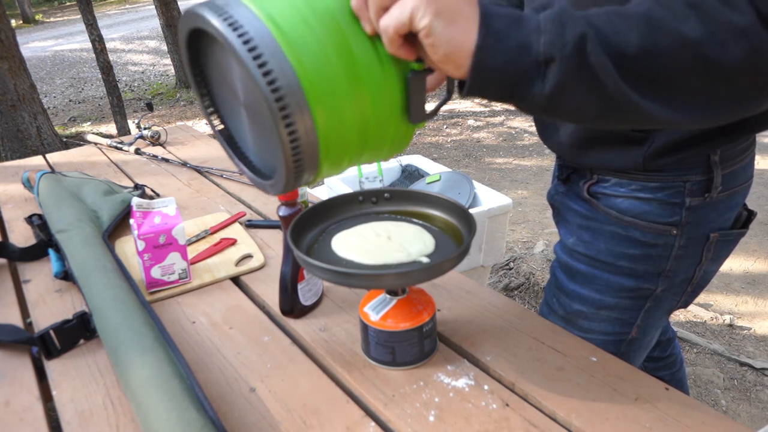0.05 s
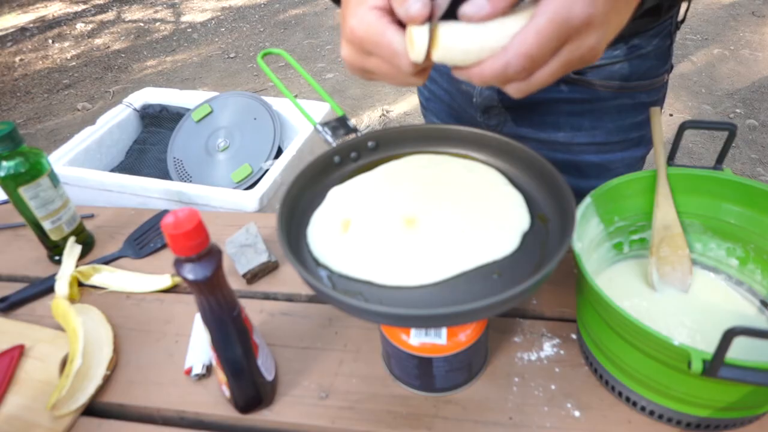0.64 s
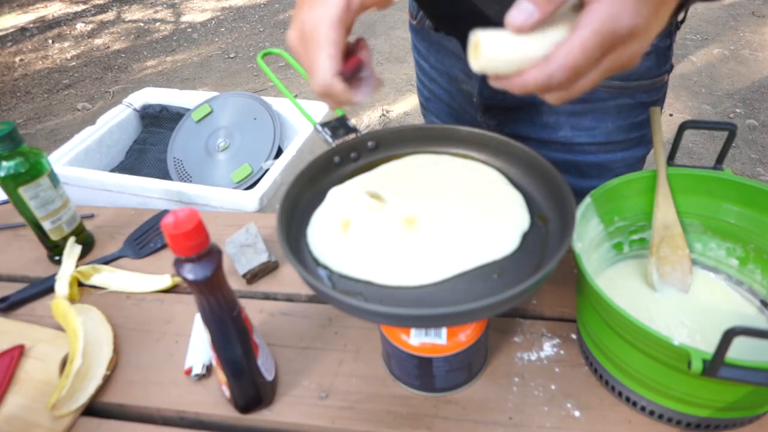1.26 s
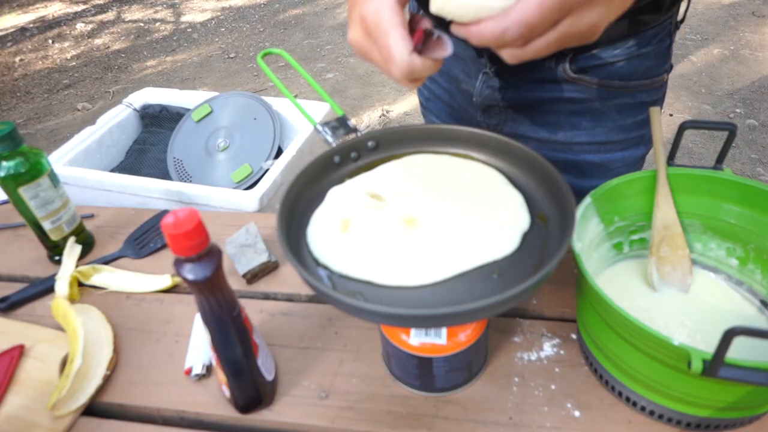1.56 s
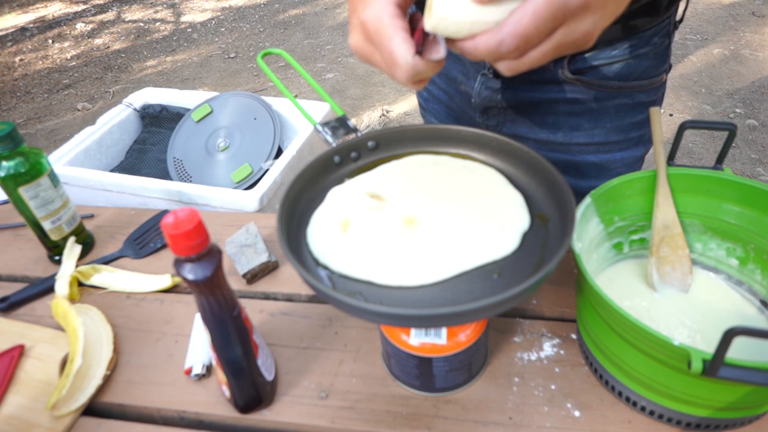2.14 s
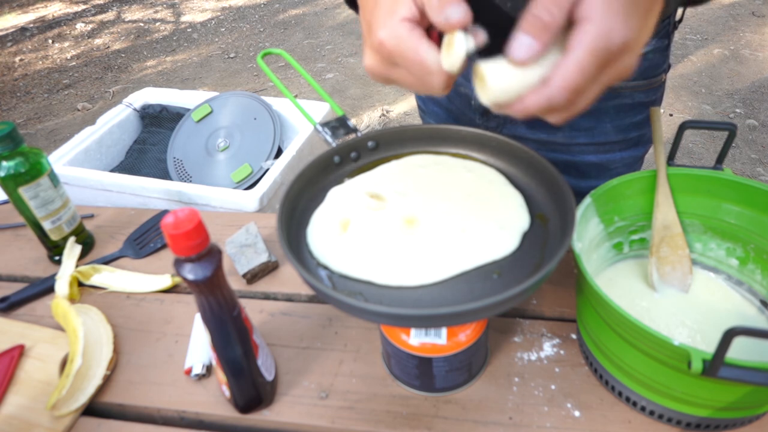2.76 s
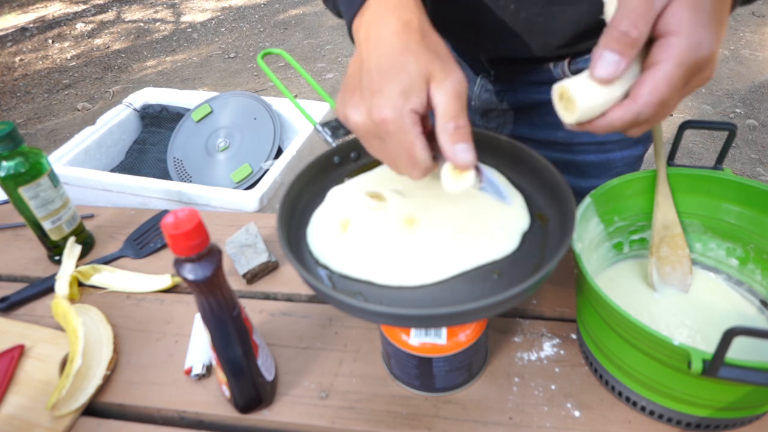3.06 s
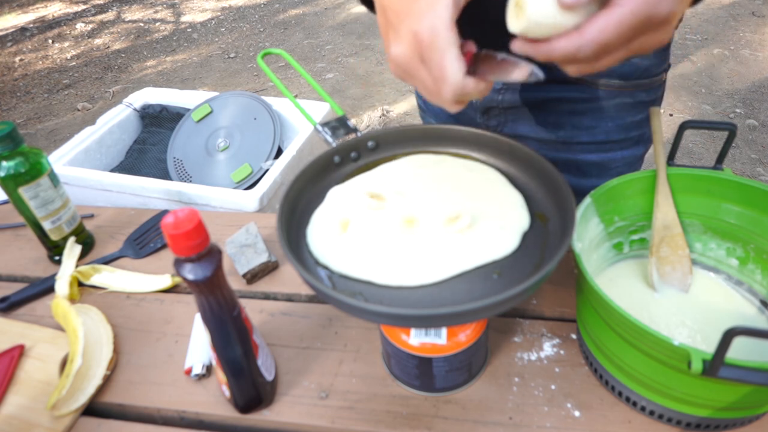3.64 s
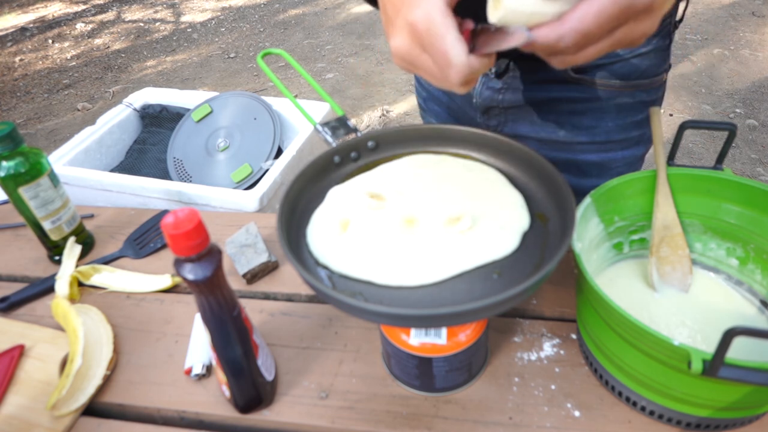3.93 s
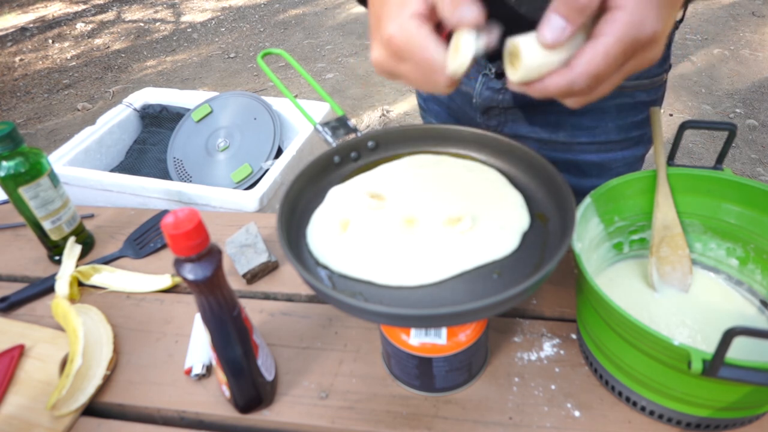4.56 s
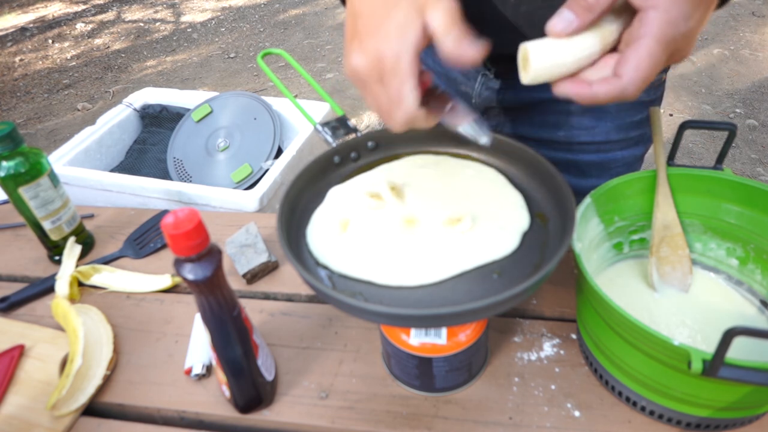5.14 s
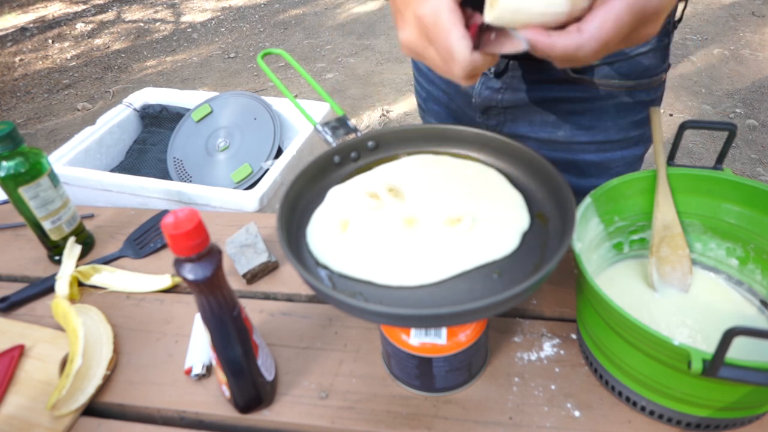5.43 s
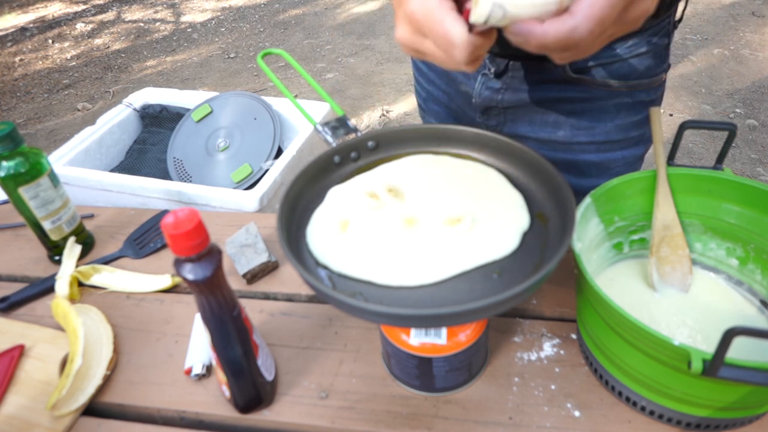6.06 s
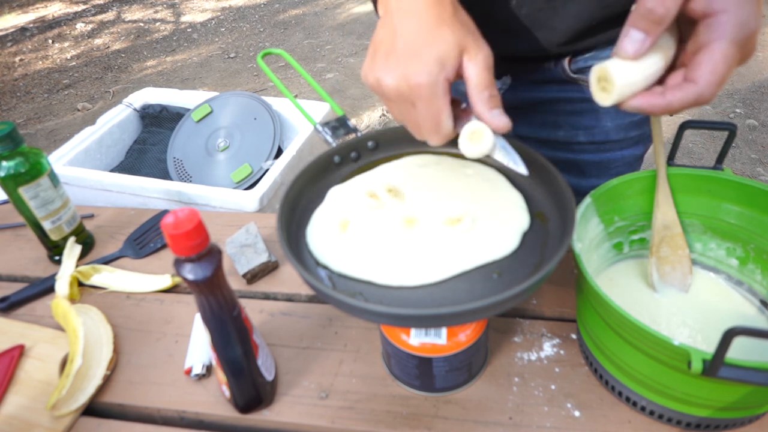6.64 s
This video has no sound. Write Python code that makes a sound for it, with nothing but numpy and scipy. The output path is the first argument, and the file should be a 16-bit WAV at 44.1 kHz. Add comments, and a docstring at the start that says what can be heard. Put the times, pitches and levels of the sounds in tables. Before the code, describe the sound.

Pancake batter crackles finely in a pan over a steadily hissing gas burner outdoors, as wind rumbles and a knife lightly knocks.

```python
"""A gas camp stove on a picnic table, under a pan of pancake batter. At first the microphone is a step
away: the turbulent flame roars softly, the jet hisses in the burner's resonances and steam bubbles burst
faintly in the batter. A third of a second in, the sound cuts with a click to close by: the sizzle
is louder, a few large bubbles pop, the jet whistles faintly and a breeze buffets the flame into a rumble.
From about one second on, a knife now and then drops banana slices lightly into the pan."""
import sys
import numpy as np
from scipy.fft import rfft, irfft, next_fast_len
from scipy.io import wavfile
from scipy.ndimage import map_coordinates

SR = 44100
rng = np.random.default_rng(int(sys.argv[2]) if len(sys.argv) > 2 else 0)


def wrap_up_sound(samples):
    """Save the sound to the file named by the first command line argument, as 16-bit audio."""
    columns = np.atleast_2d(samples).T
    # keep every value between -1 and 1, then stretch to whole-number steps
    tamed = np.clip(columns, -1, 1)
    steps = np.round(tamed * 32767).astype(np.int16)
    wavfile.write(sys.argv[1], SR, steps)


N = 299439

# Gusts across the table. Each row: time in seconds, rumble level in dB before its trim.
GUSTS = [(0.36, -49.0), (0.48, -40.5), (0.65, -49.5), (0.93, -35), (1.1, -41.5), (1.6, -40.0), (1.85, -45),
         (2.15, -40.5), (2.75, -42.5), (2.95, -36.5), (3.85, -41.5), (4.15, -38.0), (4.65, -47.5),
         (5.15, -40.0), (6.35, -45.5), (6.62, -37.5), (6.79, -46)]
# The flame in the wind. Each row: frequency in Hz, relative level in dB.
RUMBLE_SPECTRUM = [(8, -15), (22, -5.5), (43, 0), (60, -4.5), (78, -6), (100, -11), (140, -20), (300, -39),
                   (1000, -88)]
# A brief click where the sound cuts abruptly from far to close, then light knocks of knife and food.
# Each row: start in seconds, thud level in dB, click level in dB before dulling, seconds to fall 60 dB.
CLICK_AND_KNOCKS = [(.3445, -32, -38, .005), (.9628, -38, -32.5, .004), (.9650, -38, -62, .045),
                    (.9730, -54, -47, .03), (.9910, -47, -45, .04), (1.0090, -45, -44, .035),
                    (1.6753, -36.5, -70, .013), (4.9760, -44, -58, .05)]
# The two parts of each of these. Each row: frequency in Hz, relative level in dB.
THUD_SPECTRUM = [(200, -21), (500, 3), (820, 6), (1150, -9), (1500, -2), (1850, -17), (2200, -11),
                 (3000, -25), (6000, -16), (16000, -60)]
CLICK_SPECTRUM = [(500, -25), (2000, -1), (4200, 6), (7000, -8), (10000, -11), (13000, 1), (16000, -14)]
# The batter's loudest pops. Each row: start in seconds, level in dB.
LARGE_BUBBLES = [(0.4221, -34), (0.776, -33), (1.2152, -36), (1.2711, -33.5), (2.2806, -34.5),
                 (2.6981, -29), (3.4016, -34), (3.5949, -36), (4.2059, -38), (4.5238, -34), (5.4172, -33),
                 (6.1625, -34.5)]
# Flame roar and broad jet hiss, a step away and close. Each row: frequency in Hz, base level in dB per Hz.
FLAME_SPECTRUM_FAR = [(15, -85), (45, -75), (90, -70.5), (170, -66), (250, -68), (360, -66.5), (480, -76),
                      (660, -79), (760, -83), (950, -83), (1300, -92.5), (2500, -115)]
FLAME_SPECTRUM_NEAR = [(15, -95), (70, -70), (130, -68), (165, -62.5), (260, -64), (370, -65.5), (440, -70),
                       (510, -77.5), (590, -77), (660, -81), (720, -91.5), (1100, -106), (2500, -120)]
JET_SPECTRUM_FAR = [(500, -115), (1500, -93.5), (3700, -93), (4400, -103), (7000, -104.5), (11000, -105),
                    (15500, -106.5)]
JET_SPECTRUM_NEAR = [(500, -115), (1200, -102), (1900, -101), (2500, -91), (3500, -95.5), (4300, -102),
                     (7000, -101.3), (8000, -103.5), (10000, -107), (12500, -107.5), (15500, -112)]
# Resonances of the burner and the gap under the pan at both distances, and two breathy whistles.
# Each row: centre in Hz, width in Hz, base level in dB per Hz.
BURNER_MODES_FAR = [(2770, 250, -94), (3240, 230, -83), (5040, 240, -92.5), (5380, 230, -92.5),
                    (8300, 400, -105), (10700, 360, -104), (12400, 450, -102)]
BURNER_MODES_NEAR = [(862, 183, -84.5), (1353, 133, -89.5), (1583, 220, -91.5), (2198, 270, -89),
                     (2890, 440, -89.5), (3743, 354, -92), (4890, 140, -97), (7450, 250, -104),
                     (8550, 440, -91.5), (9580, 470, -101), (10630, 320, -99), (12550, 450, -109.5)]
WHISTLE_MODES = [(3270, 244, -83.5), (5310, 204, -95)]
# The whistles swell and fade. Each row: time in seconds, low whistle in dB, high whistle in dB.
# Only the swing about each mean counts, widened by SWELL_DEPTH.
WHISTLE_SWELLS = [(0.36, -59.5, -72.0), (1.0, -60.5, -69), (1.55, -59.5, -72), (2.0, -63, -70),
                  (2.3, -59.5, -72.0), (2.75, -59.5, -70), (3.05, -59, -68.5), (3.6, -59.5, -68.5),
                  (4.05, -61.5, -76), (4.4, -60, -72), (4.85, -60.5, -73.0), (5.35, -60.0, -66.5),
                  (5.65, -60.0, -72.0), (5.95, -58, -72.0), (6.25, -61.0, -68.5), (6.79, -59, -73)]

CUT_S, TOP_HZ = .3445, 15730  # the cut from far to close; the microphone's upper band limit
RUMBLE_TRIM_DB, EDDY_DB, EDDIES_PER_S = 0.5, 1.24, 9
CLICK_CYCLES = 150  # a click's treble rolls off at this many cycles per decay time
FAR_SIZZLE_DB, SETTING_DB_PER_S = -12, 0.44  # fainter a step away; the batter fries less as it sets
CLUMP_DB, CLUMPS_PER_S = 2.4, 14  # bubbles burst in clumps
FLUTTER_PER_S, ROAR_FLUTTER_DB, HISS_FLUTTER_DB = 14, 0.73, 0.25
ROAR_TRIM_DB, SWELL_DEPTH = -0.3, 1.2


def amp(db):
    """Decibels to gain."""
    return 10 ** (np.asarray(db) / 20)


def unit(x):
    """x at rms 1."""
    return x / np.sqrt(np.mean(x ** 2) + 1e-20)


def shape(points, hz):
    """Gain of (Hz, dB) points joined on a log axis."""
    point_hz, db = np.transpose(points)
    return amp(np.interp(np.log(hz + 1), np.log(point_hz + 1), db))


def curves(rows):
    """One value per sample for each column after the time."""
    times, *columns = np.transpose(rows)
    return [np.interp(np.arange(N) / SR, times, column) for column in columns]


def wobble(rate):
    """A smooth random curve, rate knots a second."""
    knots = rng.standard_normal(int(N * rate / SR) + 4)
    return map_coordinates(knots, [np.arange(N) * rate / SR])


def filtered(x, response):
    """x through a gain that is a function of frequency."""
    size = next_fast_len(N + SR // 2)
    return irfft(rfft(x, size) * response(np.fft.rfftfreq(size, 1 / SR)), size)[:N]


def resonance(hz, centre, width, db):
    """Gain of one rounded resonance."""
    return amp(db) / (1 + 2 * ((hz - centre) / width) ** 2)


def noise(gain):
    """Gaussian noise whose level per Hz is the given function of frequency."""
    return filtered(rng.standard_normal(N) * np.sqrt(SR / 2), gain)


def rush(spectrum, modes=()):
    """Turbulent noise on a broad spectrum; each resonance adds its own power."""
    def gain(hz):
        mode_power = sum(resonance(hz, *mode) ** 2 for mode in modes)
        return np.sqrt(shape(spectrum, hz) ** 2 + mode_power)
    return noise(gain)


def breeze():
    """Air moving over the table buffets the flame into a low rumble: slow gusts, quick eddies inside."""
    gust_db, = curves(GUSTS)
    eddy_db = EDDY_DB * wobble(EDDIES_PER_S)
    return amp(gust_db + RUMBLE_TRIM_DB + eddy_db) * unit(rush(RUMBLE_SPECTRUM))


def click_and_knocks():
    """The click at the cut, then knife and food: each a thud with a click on top, duller if longer."""
    thud, click = unit(rush(THUD_SPECTRUM)), unit(rush(CLICK_SPECTRUM))
    out = np.zeros(N)
    t = np.arange(SR // 8) / SR
    for start_s, thud_db, click_db, t60 in CLICK_AND_KNOCKS:
        span = round(start_s * SR) + np.arange(len(t))
        dulled = filtered(click, lambda hz: 1 / np.hypot(1, (hz * t60 / CLICK_CYCLES) ** 2))
        decay = np.exp(-np.log(1000) * t / t60)
        out[span] += (amp(thud_db) * thud[span] + amp(click_db) * dulled[span]) * decay
    return out


def bubbles(start_s, db, hz, decay_cycles):
    """Each bursting bubble is a damped sine that dies within a few cycles."""
    t = np.arange(SR // 400) / SR
    cycles = np.minimum(hz, TOP_HZ)[:, None] * t
    waves = amp(db)[:, None] * np.sin(2 * np.pi * cycles) * np.exp(-cycles / decay_cycles)
    samples = (start_s[:, None] * SR).astype(int) + np.arange(len(t))
    return np.bincount(samples.ravel(), waves.ravel(), N)[:N]


def sizzle(near, per_second, largest_db, range_db, pitch_hz):
    """Steam bursts at random at the batter's rim: a clumped crackle that slowly eases."""
    when, size_rank, pitch_rank = rng.random((int(per_second * N / SR), 3)).T
    distance_db = FAR_SIZZLE_DB * (1 - near)
    setting_db = SETTING_DB_PER_S * np.arange(N) / SR
    vigour_db = distance_db - setting_db + CLUMP_DB * wobble(CLUMPS_PER_S)
    size_db = largest_db - range_db * np.sqrt(size_rank)  # small bubbles outnumber large ones
    db = size_db + vigour_db[(when * N).astype(int)]
    hz = pitch_hz * 2 ** (.4 - 1.3 * pitch_rank ** 2)  # most are high, a few lower
    return bubbles(when * N / SR, db, hz, decay_cycles=1.86)


def pops():
    """Close to the pan, a few large bubbles stand out of the crackle."""
    start_s, db = np.transpose(LARGE_BUBBLES)
    return bubbles(start_s, db, hz=np.full(len(start_s), 12000), decay_cycles=1.3)


def whistles(wander_s):
    """The jet sings faintly in two narrow bands of noise, each wavering in pitch and swelling alone."""
    out = np.zeros(N)
    for mode, swell_db in zip(WHISTLE_MODES, curves(WHISTLE_SWELLS)):
        drifting = np.arange(N) + wander_s * SR * wobble(12)  # a drifting delay bends the pitch
        swell = amp(SWELL_DEPTH * (swell_db - swell_db.mean()))
        band = noise(lambda hz: resonance(hz, *mode))
        out += swell * map_coordinates(band, [drifting], mode="mirror")
    return out


def burner_far():
    """From a step away, the turbulent flame and the gas jet are a steady roar and hiss."""
    return rush(FLAME_SPECTRUM_FAR) + rush(JET_SPECTRUM_FAR, BURNER_MODES_FAR)


def burner_near():
    """Close up, one flutter of the flame moves roar and hiss; each resonance also swells alone."""
    flutter = wobble(FLUTTER_PER_S)
    roar = amp(ROAR_TRIM_DB + ROAR_FLUTTER_DB * flutter) * rush(FLAME_SPECTRUM_NEAR)
    ringing = sum(amp(0.77 * wobble(8)) * noise(lambda hz: resonance(hz, *mode))
                  for mode in BURNER_MODES_NEAR)
    flicker_db = 0.59 * wobble(45)
    hiss = amp(HISS_FLUTTER_DB * flutter + flicker_db) * (rush(JET_SPECTRUM_NEAR) + ringing)
    return roar + hiss + whistles(wander_s=0.000478)


def scene():
    """The stove from a step away gives way to the stove close up within two milliseconds."""
    near, = curves([(CUT_S - .001, 0), (CUT_S + .001, 1)])
    fizz = sizzle(near, per_second=800, largest_db=-41.5, range_db=19, pitch_hz=11300)
    ticks = sizzle(near, per_second=22, largest_db=-39.3, range_db=3, pitch_hz=12200)
    stove = (1 - near) * burner_far() + near * (burner_near() + breeze())
    return (stove + fizz + ticks + pops() + click_and_knocks())[None]


def record(dry):
    """One microphone, passing nothing above its band limit."""
    return filtered(dry[0], lambda hz: hz < TOP_HZ)[None]


dry = scene()
out = record(dry)
wrap_up_sound(out)
```